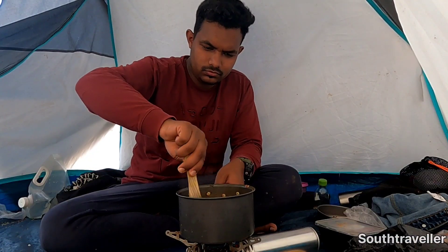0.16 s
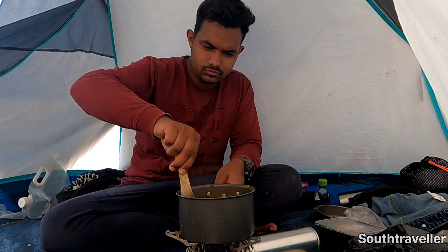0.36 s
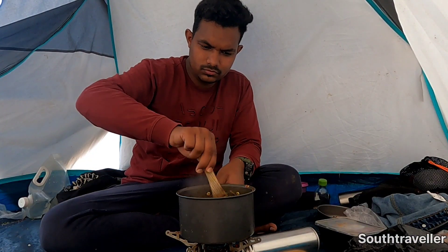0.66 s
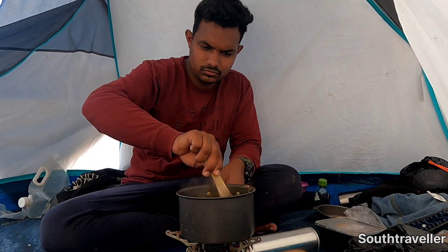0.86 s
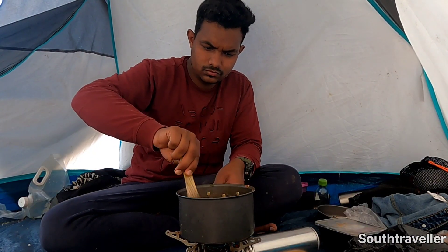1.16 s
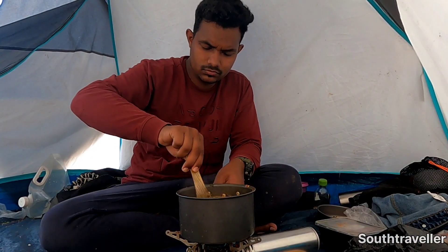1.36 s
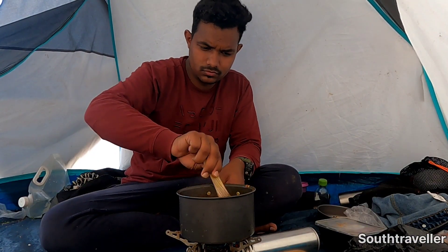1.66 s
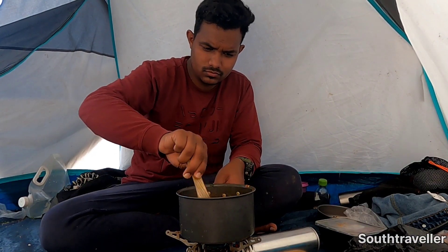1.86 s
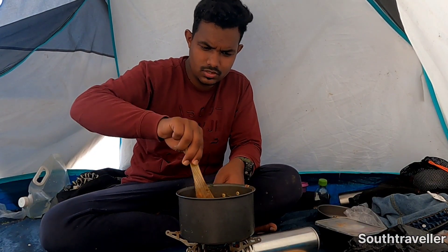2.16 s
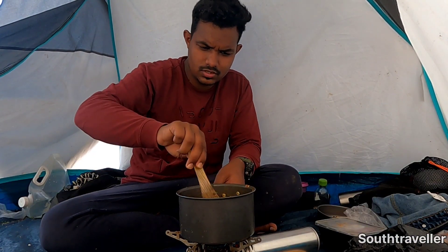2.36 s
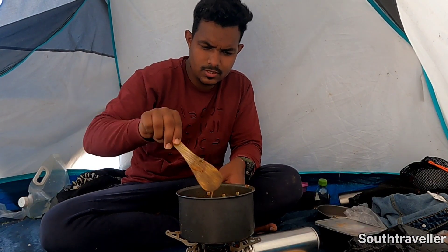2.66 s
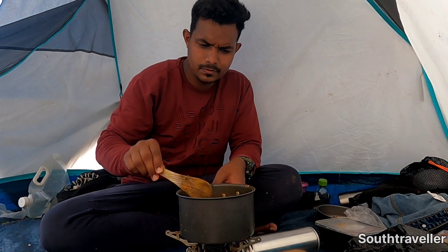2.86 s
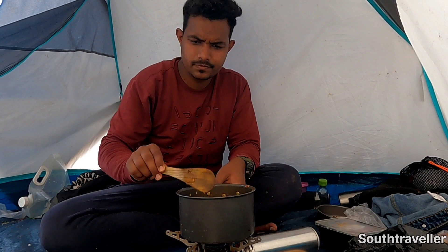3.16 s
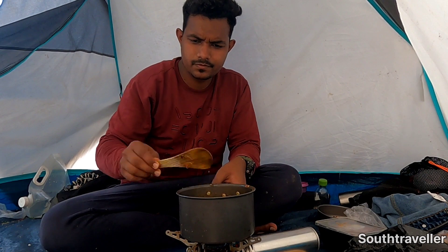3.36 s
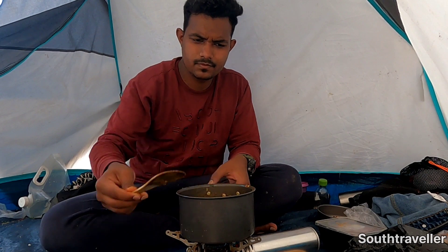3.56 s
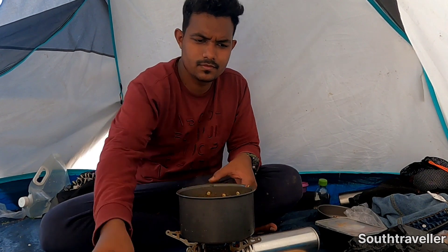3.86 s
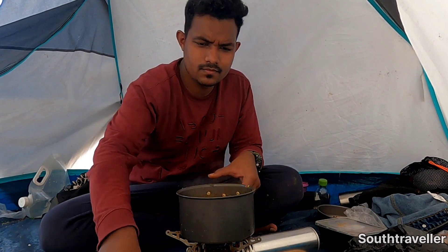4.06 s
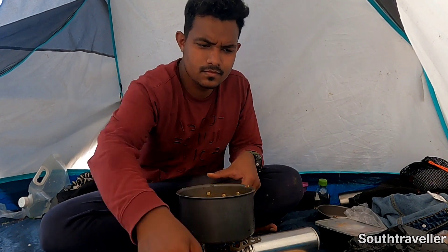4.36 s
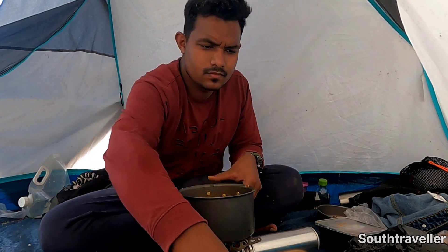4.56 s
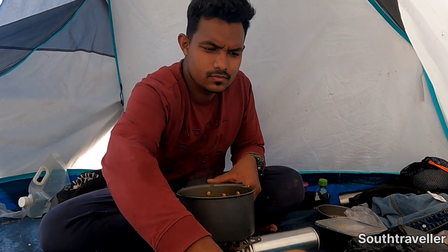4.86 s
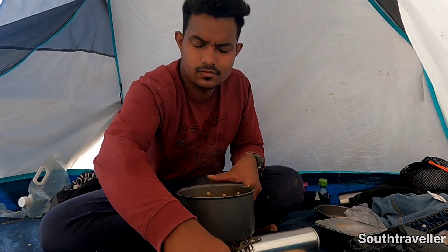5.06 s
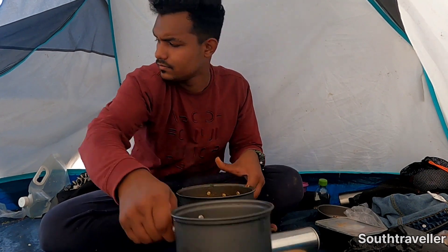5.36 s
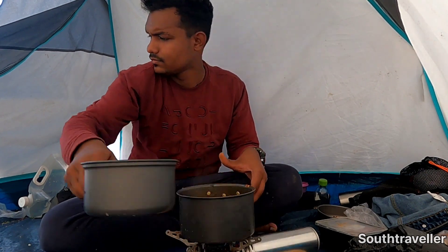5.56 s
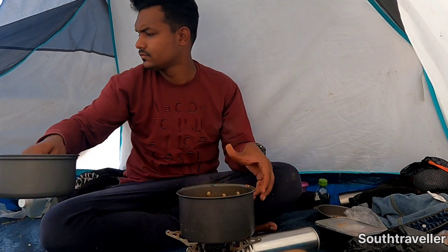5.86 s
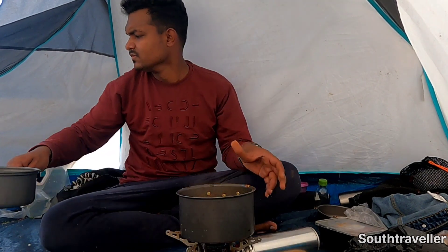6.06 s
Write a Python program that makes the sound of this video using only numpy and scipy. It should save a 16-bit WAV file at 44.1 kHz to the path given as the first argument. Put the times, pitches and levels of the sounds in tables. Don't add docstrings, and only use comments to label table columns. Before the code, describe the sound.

A gas burner hisses steadily as a wooden spoon stirs bubbling food, taps the rim four times, then an empty metal pot clanks and rings.

```python
import sys
import numpy as np
from scipy import signal
from scipy.fft import rfft, irfft, next_fast_len
from scipy.io import wavfile
from scipy.ndimage import map_coordinates

SR = 44100
rng = np.random.default_rng(int(sys.argv[2]) if len(sys.argv) > 2 else 0)


def store_wav(level_fs):
    pcm = np.round(np.clip(np.atleast_2d(level_fs), -1, 1) * 32767)
    wavfile.write(sys.argv[1], SR, pcm.T.astype(np.int16))


def invert_db(level):
    return 10 ** (np.asarray(level, dtype=float) / 20)


N = 274743
SHORT = SR // 8


def unit(x):
    return x / np.sqrt(np.mean(x ** 2) + 1e-20)


def along(points, hz):
    f, v = np.transpose(points)
    return np.interp(np.log(hz + 1), np.log(f + 1), v)


def curves(rows):
    s, *columns = np.transpose(rows)
    return [np.interp(np.arange(N) / SR, s, column) for column in columns]


def wobble(rate):
    knots = rng.standard_normal(int(N * rate / SR) + 4)
    return map_coordinates(knots, [np.arange(N) * rate / SR])


def filtered(x, response):
    m = next_fast_len(x.shape[-1] + 2048)
    spectrum = rfft(x, m) * response(np.fft.rfftfreq(m, 1 / SR))
    return irfft(spectrum, m)[..., :x.shape[-1]]


def resonances(peaks):
    def response(f):
        total = 0
        for k, (c, w, db) in enumerate(peaks):
            total = total + (-1) ** k * invert_db(db) * 1j * f * w / (c * c - f * f + 1j * f * w)
        return total
    return response


def lift(peaks):
    return lambda f: 1 + sum((invert_db(db) - 1) / (1 + (2 * (f - c) / w) ** 4) for c, w, db in peaks)


def spread(pair, gain):
    # hz, side_minus_middle_db
    width_curve = [(30, -17), (100, -17), (270, -9), (800, -12), (1900, -7), (2700, -12), (3700, -5),
                   (5300, -4.5), (6600, -8), (8000, -10), (10000, -11), (12000, -1), (15000, 0)]
    colour = lambda hz: gain(hz) * np.array([np.ones(len(hz)), invert_db(along(width_curve, hz))])
    mid, side = filtered(pair, colour)
    return unit(np.array([mid + side, mid - side]))


def add(track, s, db, sound):
    part = track[round(s * SR):][:len(sound)]
    part += (invert_db(db) * sound / np.abs(sound).max())[:len(part)]


def puff(t60, attack):
    t = np.arange(SHORT) / SR
    return rng.standard_normal(len(t)) * invert_db(-60 * t / t60) * (1 - np.exp(-t / attack))


def blow(seconds):
    t = np.arange(SHORT) / SR
    return np.sin(np.pi * t / seconds) ** 2 * (t < seconds)


def tent(x):
    # hz, t60_s
    decay = [(200, 0.058), (2000, 0.083), (10000, 0.017)]
    hz, t, z = signal.stft(rng.standard_normal((2, SR // 4)), SR, nperseg=256)
    fading = z * invert_db(-60 * t / along(decay, hz)[:, None])
    tail = signal.istft(fading, SR, nperseg=256)[1]
    return signal.fftconvolve(x[None], tail / np.linalg.norm(tail[0]), axes=1)[:, :N]


def burner():
    # hz, density_db
    jet = [(180, -23), (300, -10), (543, -17), (953, -17), (1200, -3), (2400, -9.5), (2740, -1),
           (3230, -11), (5760, -14), (6570, 3.5), (7500, -12.7), (12300, -26.8), (15500, -55)]
    # hz, width_hz, lift_db
    nozzle = [(2707, 210, 6.5), (6444, 190, 4.5), (4510, 370, 4.5), (5430, 250, 4.5), (8780, 310, 7.5),
              (9830, 890, 8), (11940, 350, 7.5), (6970, 150, 0.5), (14300, 790, 10.5)]
    # hz, density_db
    flutter = [(12, -54), (20, -7.5), (32, -4), (49, 0), (70, -14), (98, -7), (118, -20), (151, -7),
               (238, -12.5), (269, -17), (362, -20), (461, -25), (500, -33), (650, -59), (1100, -120)]
    # start_s, level_db
    gas = [(0.0, -59.5), (0.73, -56.5), (1.56, -54.5), (2.69, -52.5), (3.56, -53), (4.2, -51.5), (4.7, -54),
           (4.98, -51), (5.41, -52.5), (5.85, -50.5), (6.23, -52)]
    # start_s, swell_db
    draughts = [
        (0.1, 1.5),
        (3.1, 2),
        (4.2, 3),
        (4.96, 4),
    ]
    draught_s = .13

    def colour(hz):
        rumble_cut = 1 + (900 / (hz + 1)) ** 4
        return invert_db(along(jet, hz)) * lift(nozzle)(hz) * (hz < 14650) / rumble_cut

    upper = lambda hz: 1 / (1 + (5700 / (hz + 1)) ** 12)
    high = spread(rng.standard_normal((2, N)), lambda hz: colour(hz) * np.sqrt(upper(hz)))
    low = spread(rng.standard_normal((2, N)), lambda hz: colour(hz) * np.sqrt(1 - upper(hz)))
    flame = lambda hz: invert_db(along(flutter, hz)) / (1 + (37 / (hz + 1)) ** 8)
    roar = spread(rng.standard_normal((2, N)), flame)

    jet_db, = curves(gas)
    flicker = wobble(7.7)
    low_db = -49.6 + .4 * (jet_db - jet_db.mean())
    t = np.arange(N) / SR
    fanned_db = sum(db * np.exp(-((t - s) / draught_s) ** 2) for s, db in draughts)
    hiss = invert_db(jet_db + 2.0 + 0.2 * flicker) * high + invert_db(low_db + .5 * flicker) * low
    return hiss + invert_db(-52.6 + fanned_db + 1.23 * wobble(12)) * roar


def simmer():
    # hz, width_hz, level_db
    pot_modes = [(300, 162, -10), (488, 360, -12), (895, 125, -5), (1090, 64, -1), (1220, 90, -3.5),
                 (1490, 63, -8.5), (1870, 90, -3), (2190, 170, -12.5)]
    # start_s, level_db
    boil = [(0.0, -55.5), (0.6, -54.5), (1.0, -60.5), (1.51, -59.5), (1.8, -68), (2.36, -59.5), (2.69, -61),
            (3.07, -55.5), (3.64, -58), (4.2, -53.5), (4.7, -57), (4.98, -52), (5.36, -55), (5.75, -52),
            (6.23, -51.5)]
    # start_s, level_db
    sway = [(0.0, -56.5), (0.78, -53.5), (1.0, -63), (1.8, -68), (2.24, -59), (2.69, -64), (3.24, -55),
            (3.64, -63), (4.2, -57), (4.77, -55), (4.98, -62), (5.97, -63), (6.23, -59)]
    # start_s, peak_db, pitch_hz, t60_s
    stirred = [(0.072, -32, 1050, .015), (0.1785, -31.5, 880, .063), (0.285, -28.5, 896, .02),
               (0.315, -34, 880, .036), (0.346, -34.5, 900, .03), (0.412, -34.5, 872, .058),
               (0.465, -33, 851, .034), (0.518, -34.5, 896, .027), (0.603, -37, 1210, .064),
               (0.6368, -23, 1200, .02), (0.703, -35, 1090, .03), (0.821, -29.5, 1150, .05),
               (0.924, -32, 1090, .038), (1.013, -33, 1090, .041), (1.22, -36, 1150, .037),
               (1.289, -34, 1050, .022), (1.567, -31, 1880, .03), (1.626, -37.5, 1130, .033),
               (1.964, -38, 1250, .03), (2.398, -40, 1210, .026), (2.429, -35, 1880, .026),
               (2.525, -31.5, 980, .016), (2.772, -39, 1890, .027), (2.892, -30, 1850, .038),
               (2.924, -37.5, 2000, .04)]
    # start_s, peak_db, pitch_hz, t60_s
    stirred_more = [(0.003, -37, 1060, 0.03), (0.092, -40, 877, 0.03), (0.121, -40, 891, 0.03),
                    (0.188, -35, 1070, 0.03), (0.214, -39, 918, 0.03), (0.268, -32, 899, 0.03),
                    (0.324, -38, 886, 0.03), (0.384, -41, 1130, 0.03), (0.426, -39, 1100, 0.03),
                    (0.476, -37, 867, 0.03), (0.494, -40, 1100, 0.03), (0.549, -42, 848, 0.03),
                    (0.968, -41, 1990, 0.03), (0.993, -36, 1240, 0.03)]
    # start_s, peak_db, pitch_hz, t60_s
    free_pops = [(3.52, -30, 1940, .046), (3.576, -35, 1960, .09), (4.218, -28.5, 1340, .028),
                 (4.386, -34.5, 1220, .03), (4.494, -35, 995, .035), (4.596, -34, 1190, .03),
                 (4.788, -31, 1870, .089), (4.832, -32, 1820, .046), (4.909, -33, 1870, .036),
                 (4.975, -38, 1220, .055), (5.205, -32, 1850, .037), (5.2497, -27.5, 1170, .011),
                 (5.363, -34, 1020, .039), (5.374, -34, 1100, .051), (5.45, -28.5, 1100, .024),
                 (5.491, -32, 982, .025), (5.505, -32, 1140, .053), (5.571, -28.5, 1870, .012),
                 (5.62, -31.5, 970, .02), (5.687, -27.5, 1000, .023), (5.748, -35, 1030, .057),
                 (5.84, -30, 1100, .09), (5.877, -36.5, 1850, .03), (5.946, -24.5, 1130, .022),
                 (6.082, -29, 1140, .035), (6.116, -35, 1090, .025), (6.186, -31, 1110, .02)]
    # start_s, peak_db, pitch_hz, t60_s
    patter = [(4.425, -40, 1880, 0.025), (4.504, -36, 1060, 0.025), (4.645, -43, 1180, 0.025),
              (4.768, -37, 1870, 0.025), (4.807, -35, 1230, 0.025), (5.009, -38, 1210, 0.025),
              (5.272, -43, 1890, 0.025), (5.332, -41, 1240, 0.025), (5.346, -37, 1850, 0.025),
              (5.424, -43, 1140, 0.025), (5.51, -33, 1150, 0.025), (5.538, -41, 1060, 0.025),
              (5.56, -31, 1870, 0.025), (5.666, -37, 939, 0.025), (5.673, -30, 1070, 0.025),
              (5.727, -36, 964, 0.025), (5.761, -34, 1230, 0.025), (5.783, -38, 1130, 0.025),
              (5.829, -32, 950, 0.025), (5.854, -31, 1220, 0.025), (5.905, -40, 1270, 0.025),
              (5.986, -39, 1120, 0.025), (6.006, -37, 899, 0.025), (6.094, -35, 1080, 0.025),
              (6.127, -34, 1080, 0.025), (6.206, -32, 1080, 0.025)]

    (level_db,), (slosh_db,) = curves(boil), curves(sway)
    sizes = invert_db(3.2 * rng.exponential(size=N).clip(0, 2.5))
    bursts = (rng.random(N) < 300 / SR) * sizes * rng.choice([-1, 1], N)
    small = unit(bursts) * invert_db(2.5 * wobble(70)) + .3 * rng.standard_normal(N)
    ringing = filtered(small, lambda f: resonances(pot_modes)(f) / (1 + 1j * f / 2500) ** 2)
    track = invert_db(level_db + 2.2) * unit(ringing)
    lumps = invert_db(3.9 * wobble(35)) * rng.standard_normal(N)
    slosh = filtered(lumps, lambda f: resonances([(370, 380, 0)])(f) ** 2)
    track += invert_db(slosh_db - 3) * unit(slosh)

    pops = [(*p, -4) for p in stirred + stirred_more] + [(*p, 2) for p in free_pops + patter]
    for s, db, hz, t60, upper_db in pops:
        struck = [(c, w, g + rng.normal(0, 3) + upper_db * (c > 1600) - 7 * (c < 600))
                  for c, w, g in pot_modes]
        body = resonances(struck + [(hz, 180, 3.5)])
        spatter = .55 * (t60 / .04) ** 1.6 * puff(t60, 0.002)
        muffled = lambda f: body(f) / (1 + 1j * f / 3500) ** 3 / (1 + 600 / (1j * f + 1)) ** 2
        add(track, s - .0007, db - 3, filtered(blow(0.00019) + spatter, muffled))
    return track


def brushing():
    # peak_s, level_db, rise_20db_s, fall_20db_s
    strokes = [
        (2.322, -58, .18, .14),
        (2.444, -59, .14, .14),
        (2.526, -61, .03, .05),
        (2.7, -64, .2, .02),
        (4.848, -48, .025, .04),
        (5.154, -55, .5, .015),
        (5.386, -54, .035, .035),
        (6.23, -35, .075, .1),
    ]
    # hz, density_db
    cloth = [(200, -32), (800, -4), (2300, -5), (4200, -4.5), (9500, -8), (15000, -43)]
    # hz, width_hz, lift_db
    rubbed = [(2550, 150, 9), (3860, 190, 10), (4220, 120, 12.5), (5270, 80, 12.5), (7800, 150, 10)]
    t = np.arange(N) / SR
    stroke = 0
    for s, db, rise, fall in strokes:
        stroke = stroke + invert_db(db - 20 * np.where(t < s, (s - t) / rise, (t - s) / fall))
    grains = invert_db(0.83 * wobble(250)) * rng.standard_normal((2, N))
    sliding = spread(grains, lambda hz: invert_db(along(cloth, hz)) * lift(rubbed)(hz))
    return invert_db([[4], [2.5]]) * stroke * sliding


def spoon():
    # start_s, peak_db, low_modes_db, chatter_db, t60_s
    taps = [
        (3.0243, -15, 1.5, -25, 0.058),
        (3.1626, -17.5, 1.5, -24.5, 0.069),
        (3.2982, -17, 4, -25.5, 0.069),
        (3.4196, -20.5, 9, -29.5, 0.064),
    ]
    # hz, width_hz, level_db
    spoon_modes = [(237, 30, -5), (440, 50, -3), (665, 70, -5), (830, 90, -1), (985, 60, -1),
                   (1110, 70, 4.5), (1290, 75, 6.5), (1460, 80, 3.5), (1650, 70, 3), (1870, 50, 8),
                   (2200, 55, 3), (2500, 90, 3), (2900, 80, 3), (3760, 140, -20)]
    # start_s, peak_db, pitch_hz, t60_s
    bumps = [(0.6373, -24.5, 200, 0.065), (0.6518, -32, 290, 0.084), (0.6603, -34, 188, 0.071),
             (0.107, -38, 290, .03), (1.031, -37.5, 168, 0.13), (1.105, -37, 175, 0.037),
             (2.15, -39.5, 185, 0.024), (2.525, -41, 142, 0.096), (4.274, -33, 200, 0.1),
             (3.045, -40, 150, .08), (3.17, -41, 150, .08), (3.43, -42, 150, .07), (4.812, -43, 200, 0.082),
             (6.198, -38, 240, 0.085)]

    track, t = np.zeros(N), np.arange(SHORT) / SR
    stand = resonances([(3500, 3000, 0), (7800, 4000, -2)])
    for s, db, low_db, chatter_db, t60 in taps:
        rebound = 0.22 * np.roll(blow(0.00022), round(0.003035 * SR))
        knock = blow(0.00029) + rebound
        wood = resonances([(c, 1.42 * w, g + rng.normal(0, 0.72) + low_db * (c < 1100))
                           for c, w, g in spoon_modes])
        rough_knock = knock + 0.4 * puff(t60, 0.0023)
        add(track, s, db, filtered(rough_knock, lambda f: wood(f) / (1 + 1j * f / 4000) ** 2))
        chatter = filtered(puff(1.06 * t60, 0.0026), lambda f: stand(f) / (1 + (f / 10800) ** 8))
        add(track, s + 0.0012, chatter_db, chatter)

    thuds = [(s + .008, db - 21, 220, .07) for s, db, *_ in taps]
    for s, db, hz, t60 in bumps + thuds:
        onset = 1 - np.exp(-(t / 0.001) ** 2)
        add(track, s - .001, db, np.sin(2 * np.pi * hz * t) * invert_db(-60 * t / t60) * onset)
    return track


def empty_pot():
    # start_s, peak_db, brightness_db, t60_s, held_after_s
    laid_hits = [
        (4.0396, -9.5, -3, 0.09, 0.04),
        (4.046, -22, 0, .07, 0.03),
        (4.056, -21.5, 7, 0.25, 0.027),
    ]
    # hz, width_hz, level_db
    laid_modes = [(406, 12, -2), (670, 40, -10), (890, 60, -7), (1010, 60, -14), (1081, 40, 2),
                  (1257, 25, -9), (1523, 35, -9), (1660, 30, -11), (1983, 35, -9), (2194, 20, -15),
                  (2430, 40, -10), (2590, 50, -4), (2994, 30, -7), (3244, 20, -13), (3401, 12, -11),
                  (3552, 15, -12), (3885, 10, -11), (4021, 15, -14), (4200, 16, -12), (4743, 35, -11),
                  (5120, 15, -12), (6730, 66, -16), (7450, 52, -10.5), (8660, 99, -24)]
    # start_s, peak_db, brightness_db, t60_s, held_after_s
    clanks = [
        (4.2706, -12, 2, 0.069, .05),
        (4.2769, -16, -8, 0.04, .05),
        (4.2805, -13.5, 3, 0.17, .05),
        (4.2904, -20.5, -1, 0.26, 0.06),
        (4.309, -28, -1, 0.11, 0.034),
        (4.362, -34, 2, 0.079, 0.026),
    ]
    # hz, width_hz, level_db
    wall_modes = [(402, 10, 1), (526, 40, -7), (595, 55, -3), (934, 20, -3), (1003, 40, 4), (1211, 10, 6),
                  (1340, 50, -11), (1520, 40, -13), (1868, 25, -6), (2090, 22, -6), (2320, 21, -13),
                  (2480, 80, -14), (2650, 40, 1), (3061, 25, -6), (3480, 70, -8), (3850, 20, -10),
                  (4000, 30, -7), (4705, 28, -2), (4910, 60, -10), (5350, 35, -15), (5660, 100, -20),
                  (6230, 35, -6), (7030, 88, -10), (7940, 44, -11), (8800, 49, -12), (9070, 55, -17)]
    # hz, density_db
    rattle = [(88, -44), (150, -12), (583, -8), (1220, -3), (1760, -10), (2060, -6), (2310, -16),
              (2550, -11), (4750, -10.5), (8660, -17.5), (15500, -45)]
    # start_s, peak_db, pitch_hz, width_hz, t60_s
    ticks = [(0.636, -31, 1170, 1200, 0.038), (0.646, -36, 1300, 2200, 0.23), (0.643, -39, 2650, 750, 0.18),
             (.681, -36.5, 840, 700, 0.028), (.652, -38, 2400, 600, .02), (.662, -39, 2300, 500, .025),
             (.673, -41, 2500, 900, .015), (.688, -38, 1100, 600, .015), (.7066, -39, 2750, 900, .015),
             (4.8515, -31, 2300, 900, .008), (4.8575, -31, 2650, 700, .01), (4.8655, -34, 2900, 900, .008),
             (2.44, -39, 1500, 1200, .02), (2.152, -41, 1500, 1500, .02), (0.002, -41, 520, 400, .015),
             (0.178, -42, 450, 200, .04), (1.204, -37.5, 7800, 2200, 0.033), (4.024, -36, 1980, 300, 0.033),
             (4.135, -37, 1800, 1500, 0.074), (4.187, -43, 8300, 3000, 0.048),
             (4.8457, -24, 2900, 1500, .007), (4.849, -36, 1900, 2000, 0.07), (4.857, -38, 1080, 910, .04),
             (1.965, -45, 3500, 2500, 0.035), (2.15, -44, 7000, 4500, .04), (4.935, -44, 4500, 3030, .03),
             (5.144, -34, 5950, 600, .03), (5.385, -43, 7760, 2500, .04), (6.226, -30.5, 2640, 2500, 0.015),
             (4.2663, -25, 7600, 3500, .04), (4.2715, -21, 2650, 600, .025), (4.3085, -31, 7300, 600, .02),
             (4.3085, -32, 4000, 500, .025), (4.313, -36, 7900, 300, .06), (4.313, -34, 5350, 300, .04),
             (4.606, -42, 3500, 2500, .015), (4.8338, -33, 1800, 1200, .008), (4.863, -36, 1400, 1500, .05),
             (6.196, -34, 4000, 800, .08), (6.212, -30, 4000, 800, .08), (6.222, -30, 4000, 900, .05),
             (6.21, -34, 5300, 500, .07)]

    track, t = np.zeros(N), np.arange(SHORT) / SR
    for contacts, modes in ((laid_hits, laid_modes), (clanks, wall_modes)):
        for s, db, bright_db, t60, held in contacts:
            tilt = lambda hz: invert_db(bright_db * np.clip(np.log2((hz + 1) / 1500) / 2, 0, 1))
            ring = 0
            for hz, width, level in modes:
                fading = invert_db(level + rng.normal(0, 1.5) - t * (60 / t60 + 9.6 * width))
                cycles = hz * t + .12 * rng.normal()
                ring = ring + fading * np.sqrt(width) * tilt(hz) * np.sin(2 * np.pi * cycles)
            base = lambda hz: invert_db(along(rattle, hz)) * tilt(hz) / (1 + (600 / (hz + 1)) ** 3)
            chatter = filtered(puff(t60, 0.00058), base)
            stop = invert_db(-1100 * np.maximum(t - held, 0)) * (1 - np.exp(-t / 0.00023))
            add(track, s, db, (unit(ring) + invert_db(-6.5) * unit(chatter)) * stop)
    for s, db, hz, width, t60 in ticks:
        band = resonances([(hz, width, 0)])
        add(track, s, db, filtered(puff(t60, min(.0024, t60 / 15)), lambda f: band(f) ** 3))
    return track


def scene():
    # hz, side_minus_middle_db
    scatter = [(300, -27), (1200, -20), (2700, -10), (4500, -6.5), (10000, -6), (12500, -1)]
    near = simmer() + spoon() + empty_pot()
    smear = puff(.012, .0002)
    smeared = signal.fftconvolve(near, smear / np.linalg.norm(smear))[:N]
    side = filtered(smeared, lambda hz: invert_db(along(scatter, hz)))
    close = near * invert_db([[.3], [-.3]]) + [side, -side]
    reflected = tent(filtered(near, lambda hz: 1 / (1 + 500 / (1j * hz + 1))))
    return close + invert_db(-13) * reflected + burner() + brushing()


def top_cut(x):
    return signal.sosfilt(signal.butter(12, 15660, fs=SR, output="sos"), x)


def record(dry):
    # hz, left_minus_right_db
    lean = [(1900, .3), (2700, 1.5), (3700, 0), (6000, 0), (9000, .6), (10500, .8), (13000, 6)]
    # hz, lag_rad
    lag = [(80, 0), (330, .3), (700, .12), (1200, .33), (1900, .3), (2700, .7), (6400, .5), (8000, .05)]
    half = lambda hz: invert_db(along(lean, hz) / 2) * np.exp(-.5j * along(lag, hz))
    top_hz = 15600
    heard = filtered(dry, lambda hz: np.array([half(hz), 1 / half(hz)]) * (hz < top_hz))
    return top_cut(heard)


dry = scene()
out = record(dry)
store_wav(out)
```